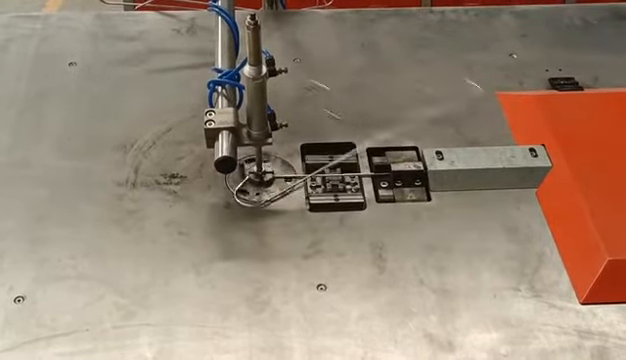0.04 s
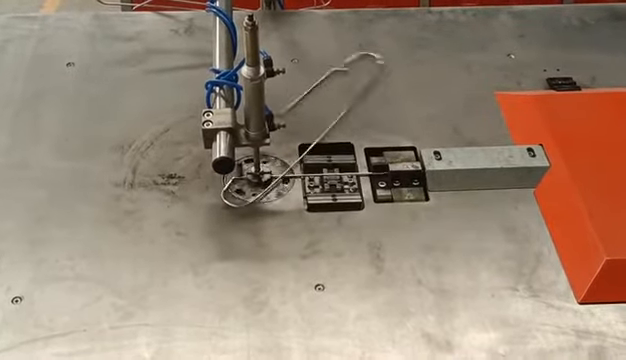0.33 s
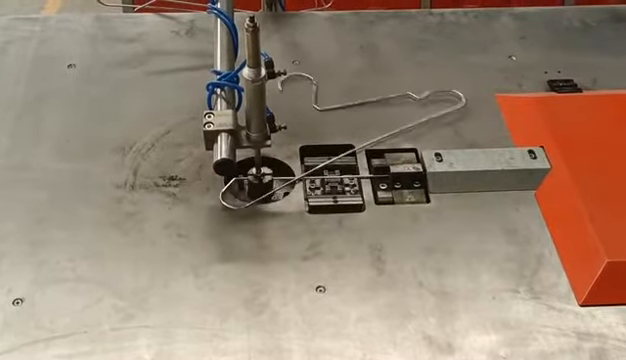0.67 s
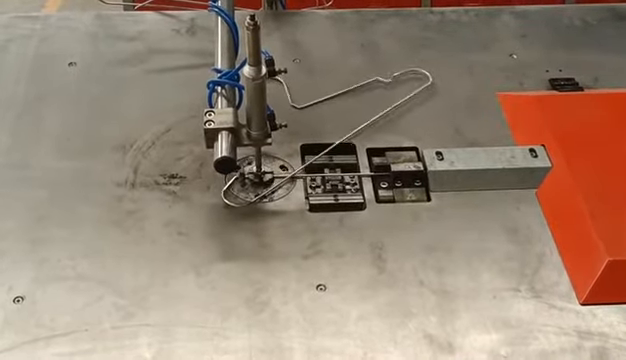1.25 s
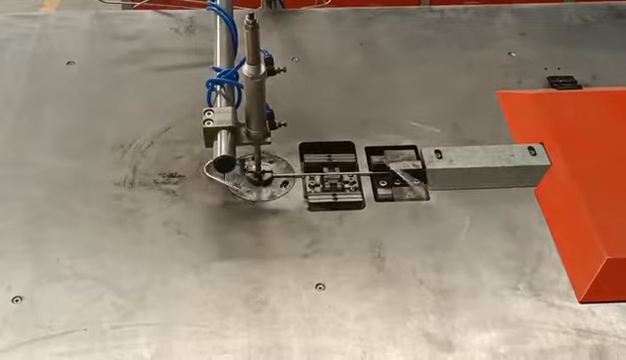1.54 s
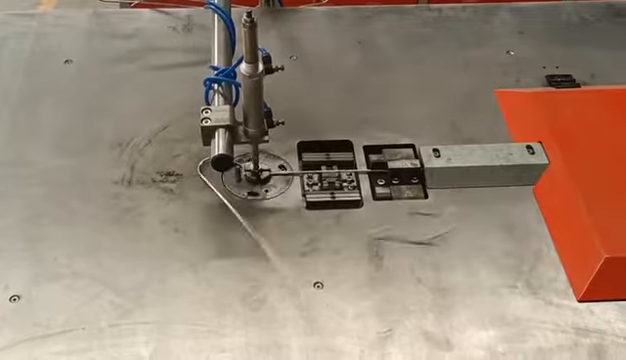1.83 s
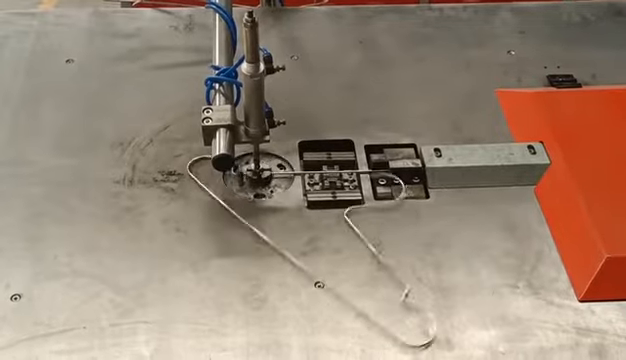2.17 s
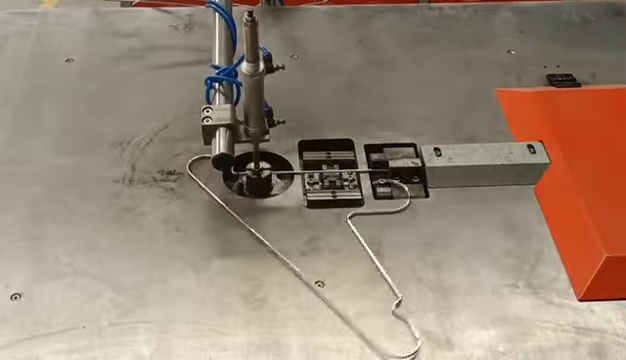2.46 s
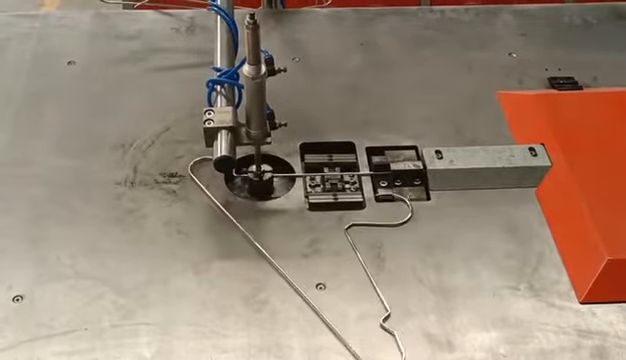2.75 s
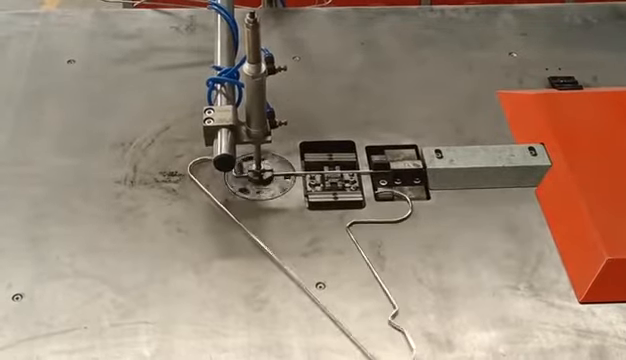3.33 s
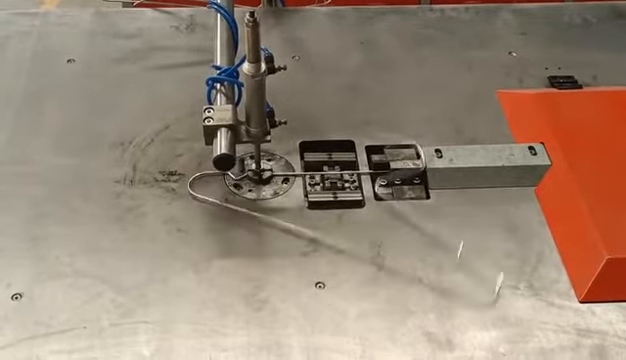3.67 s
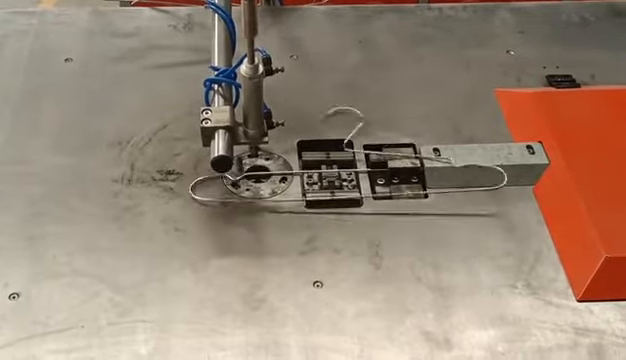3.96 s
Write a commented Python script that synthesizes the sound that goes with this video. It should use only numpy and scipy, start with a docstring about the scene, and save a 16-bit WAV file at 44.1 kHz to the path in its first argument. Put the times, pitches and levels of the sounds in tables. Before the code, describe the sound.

A wire bending machine rumbles and whirs over steady noise in a reverberant workshop. Two light wire slaps on a steel table open, and the head clunks at 0.25 and 0.9 seconds, a thin servo whine between moves. From 1.3 seconds the wire slaps and chatters, with more clunks at 2 and 2.8. From 3.2 come dull jolts and more slaps, then the wire skids and rings until 4 seconds.

```python
"""A wire bending machine works in a reverberant workshop, its drives rumbling over the steady hall noise.
It opens with two light slaps of the long steel wire on the sheet-steel table. The bending head clunks as
it shifts at 0.25 and 0.9 s, and a servo whines between the moves. From 1.3 s the wire slaps and chatters,
and the head clunks again at 2 and 2.8 s. From 3.2 s the frame jolts under a last flurry of slaps,
then the wire skids over the table, ringing freely."""
import sys
import numpy as np
from scipy import signal
from scipy.fft import rfft, irfft, next_fast_len
from scipy.io import wavfile
from scipy.ndimage import uniform_filter1d, map_coordinates

SR = 44100
rng = np.random.default_rng(int(sys.argv[2]) if len(sys.argv) > 2 else 0)


def materialize(psi):
    """Save the field psi as 16-bit PCM at rate SR to the path in sys.argv[1].

    A 1-D psi becomes a single channel; in a 2-D psi each row is a channel.
    """
    bounded = np.clip(np.atleast_2d(psi).T, -1, 1)
    quanta = np.round(bounded * 32767).astype(np.int16)
    wavfile.write(sys.argv[1], SR, quanta)


N = 176400

# Stereo image, tight lows and wide highs: f/Hz, left-right correlation
STEREO_IMAGE = [(30, .9), (100, .975), (300, .97), (520, .92), (650, .45), (820, .2), (1150, .45),
                (1800, 0), (2500, .2), (4000, .06), (6000, .03), (7500, .15)]
# Reverb decay: f/Hz, t60/s
REVERB_DECAY = [(100, 0.44), (1000, 0.72), (4000, 0.84), (8000, 0.31)]
# Tone of the hall, the drives and the gears: f/Hz, level/dB
HALL_EQ = [(25, -19), (60, -15.5), (125, 10.5), (190, -1.5), (265, 10), (400, -3.5), (800, -4), (1500, -10),
           (2300, -4), (3200, -1), (4100, -17), (5000, -18), (7500, -46.5)]
RUMBLE_EQ = [(25, -34.5), (45, -27), (75, -23.5), (115, -2), (170, -1), (250, -1), (330, 0.5), (430, -1.5),
             (600, -7), (900, -11), (2000, -36)]
WHIRR_EQ = [(200, -13), (600, -8), (900, -3), (1300, -0.5), (1850, -0.5), (2400, 1.5), (3400, -3),
            (4100, -1.5), (4700, -7.5), (7500, -14.5)]
# Cabinet panels droning with the drives: f/Hz, level/dB relative to the rumble
PANEL_MODES = [(62, -21), (93, -13), (127, -13.5), (240, -13), (410, -14)]
# Fader rides for drive rumble, gear whirr, high hiss and servo whine: t/s, level/dB
RUMBLE_FADER = [(0, -36), (.14, -45), (.2, -33), (.48, -35), (.6, -31.5), (.73, -34), (.86, -31.5),
                (1.25, -32), (1.52, -37), (1.7, -31), (1.92, -35.5), (2.02, -32), (2.2, -36), (2.36, -45),
                (2.56, -50), (2.66, -35), (2.95, -31), (3.05, -33.5), (3.27, -28), (3.44, -33),
                (3.65, -29.5), (4, -33.5)]
WHIRR_FADER = [(0, -29), (.12, -33), (.2, -28.5), (.48, -32.5), (.6, -27), (.72, -30.5), (.82, -27.5),
               (1.25, -31.5), (1.9, -31), (2.2, -32.5), (2.35, -37.5), (2.6, -37.5), (2.75, -36),
               (2.92, -31), (3.1, -31.5), (3.3, -30), (3.65, -29), (4, -42.5)]
HISS_FADER = [(0, -32), (.22, -36.5), (.48, -40.5), (.58, -35), (.73, -42.5), (.79, -36), (1.15, -57),
              (1.6, -34.5), (2.25, -34), (2.4, -56), (2.62, -55.5), (2.65, -38), (2.75, -48.5),
              (3.1, -45.5), (3.25, -30), (4, -31.5)]
WHINE_FADER = [(0, -44), (.2, -50), (.37, -45), (.45, -37.5), (.53, -48), (.6, -33.5), (.66, -48),
               (.72, -40), (.78, -46), (1.09, -43), (1.13, -37), (1.22, -33.5), (1.285, -36), (1.31, -50),
               (2.32, -51), (2.37, -42), (2.42, -49), (2.5, -39), (2.55, -49), (2.6, -44), (3.09, -42),
               (3.12, -32.5), (3.17, -29.5), (3.195, -32), (3.215, -43), (3.32, -38), (3.4, -48), (4, -43)]
# Head and feed drive jolting the frame: t/s, level/dB, f/Hz
JOLT_CUES = [(0.925, -21.5, 286.5), (2.811, -23.5, 622), (3.226, -24, 178.6), (3.5, -25.5, 90),
             (3.587, -19, 253), (3.622, -23.5, 241), (3.686, -29.5, 279.7)]
# Knocks and pings of the tooling: t/s, level/dB, f/Hz, t60/s
KNOCK_CUES = [(0.2522, -4, 1264, .009), (0.257, -22, 4150, .1), (2.0465, -14, 1264, .009),
              (2.7855, -15, 5980, .035), (3.412, -20, 6700, .02)]
# Head clunks: t/s, thud/dB, clank/dB, clash/dB, thud and boom delay/s, metal attack/s, boom/dB
CLUNK_CUES = [(0.25, -22, -20.5, -26, .002, 0.0046, -50), (0.91, -21, -20, -11.5, 0.0093, 0.017, -26.5),
              (0.957, -33.5, -31, -28, .004, .008, -35.5), (2.04, -19.5, -18, -23.5, 0.0034, 0.0027, -52),
              (2.786, -20.5, -20.5, -13.5, 0.02, 0.0046, -30)]
# The four layers of a clunk, dark to bright: f/Hz, level/dB
BOOM_EQ = [(25, -35), (40, -21), (60, 2.5), (76, -8.5), (93, 3), (110, 2.5), (140, -23), (400, -44.5)]
THUD_EQ = [(25, -26.5), (60, -47), (95, -1.5), (150, -0.5), (230, -6), (380, -4), (600, -8), (1000, -15.5),
           (2500, -40.5)]
CLANK_EQ = [(300, -22.5), (700, -3.5), (1200, 3), (1900, 0), (2600, 7.5), (3400, -1.5), (4100, 7),
            (4800, -11.5), (8000, -25.5)]
CLASH_EQ = [(1500, -26.5), (2900, 3), (4000, -8), (5000, 3), (6200, 7.5), (7300, 13), (8000, -19.5)]
# Body and sheen of the steel table: f/Hz, level/dB
TABLE_BODY_EQ = [(200, -32.5), (450, -2.5), (850, -10.5), (1250, -2), (1900, -3.5), (2500, 1), (3000, 4.5),
                 (3450, 0.5), (3950, 6.5), (4800, 0.5), (5600, -28.5), (7000, -26)]
TABLE_TREBLE_EQ = [(3500, -39), (5000, 8), (5600, 9.5), (6100, 12), (6900, 15), (7450, 13), (8200, -29.5)]
# Ringing modes of the wire: f/Hz, relative level/dB
WIRE_MODES = [(2186, -7), (2460, 0), (2507, 5.5), (2724, -4), (3004, -3), (3180, -7), (3811, -5),
              (3951, -3), (4240, -5), (4305, -3), (5020, -3), (5776, 0), (5990, 2), (6105, 0), (6412, -2),
              (6535, 0), (6805, -1), (6928, 3), (7189, 2), (7386, 2)]
# The wire slapping and skidding on the table: t/s, level/dB, chatter length/s, treble lift/dB, attack/s
SLAP_CUES = [(0.001, -26.5, 0.01, -5.5, 0.0026), (0.178, -27, 0.027, -5, 0.0072),
             (1.3, -21.5, .024, -0.5, 0.0015), (1.359, -21.5, .012, -2, 0.0035),
             (1.44, -20, 0.009, 0.5, 0.0014), (1.524, -19.5, 0.016, 1, 0.012),
             (1.641, -16.5, 0.008, 0, 0.004), (1.672, -16.5, 0.0088, -3, 0.0013),
             (1.73, -22.5, 0.018, -4.5, 0.0097), (1.762, -18.5, 0.0059, 2.5, 0.0029),
             (1.874, -16, 0.0088, -4, .002), (1.893, -23, .012, 0, .004), (1.987, -20, 0.022, -0.5, 0.021),
             (2.074, -31, 0.033, 9, 0.005), (2.127, -26, 0.0094, -0.5, 0.0041),
             (2.175, -30, 0.023, -4.5, 0.0049), (2.216, -31, 0.015, -13, 0.0039),
             (2.269, -31.5, 0.02, -1, 0.0034), (3.202, -21, 0.019, -2, 0.011),
             (3.264, -23.5, 0.018, 4, 0.0057), (3.275, -17.5, 0.023, -4, 0.0042),
             (3.344, -20.5, 0.018, -1, 0.017), (3.358, -22, 0.006, -2, 0.004),
             (3.402, -25, 0.004, -1, .002), (3.443, -27.5, 0.014, 4.5, 0.0065),
             (3.521, -20.5, 0.016, -1, 0.0042)]
SKID_CUES = [(3.565, -21.5, 0.04, -1, 0.015), (3.611, -22.5, 0.018, 4.5, 0.004),
             (3.651, -17, 0.013, 0.5, 0.0051), (3.72, -22, 0.022, 4, 0.0022),
             (3.759, -22.5, 0.015, 0, .006), (3.803, -26.5, 0.021, -3, 0.008),
             (3.88, -18.5, 0.024, 4.5, 0.0078), (3.911, -20, 0.015, -3.5, 0.006),
             (3.938, -25, 0.011, 1.5, .004)]


def amp(db):
    """Decibels to gain."""
    return 10 ** (np.asarray(db) / 20)


def unit(x):
    """Scale to rms 1."""
    return x / np.sqrt(np.mean(x ** 2) + 1e-20)


def along(points, hz):
    """Read a curve of (f/Hz, value) points on a log frequency axis."""
    freqs, values = np.transpose(points)
    return np.interp(np.log(hz + 1), np.log(freqs + 1), values)


def fader(rows):
    """Gain per sample from (t/s, level/dB) rows."""
    return amp(np.interp(np.arange(N) / SR, *np.transpose(rows)))


def wobble(rate):
    """A smooth random modulator with `rate` knots a second."""
    return map_coordinates(rng.standard_normal(int(N * rate / SR) + 4), [np.arange(N) * rate / SR])


def burst(start, attack, hold, t60):
    """Hit envelope, in seconds: a linear attack, and an exponential release from start + hold."""
    envelope, first = np.zeros(N), max(int(start * SR), 0)
    t = np.arange(first, min(N, first + int((hold + 1.2 * t60) * SR))) / SR - start
    envelope[first:first + len(t)] = np.clip(t / attack, 0, 1) * amp(-60 * np.maximum(t - hold, 0) / t60)
    return envelope


def coloured(pair, eq):
    """EQ two unrelated signals and mix them as mid and side into stereo of rms 1."""
    hz = np.fft.rfftfreq(N, 1 / SR)
    width = np.arccos(np.clip(along(STEREO_IMAGE, hz), -1, 1)) / 2
    mid, side = irfft(rfft(pair) * amp(along(eq, hz)) * [np.cos(width), np.sin(width)], N)
    return unit(np.array([mid + side, mid - side]))


def noise(eq):
    """Smooth stereo noise through an EQ curve."""
    return coloured(rng.standard_normal((2, N)), eq)


def steel_wash(depth_db=7.5):
    """The steel's dense resonances come and go as the contact point moves."""
    spectra = signal.stft(rng.standard_normal((2, N)), nperseg=1024)[2]
    shared = rng.standard_normal(spectra.shape[1:])
    patches = shared + 0.52 * rng.standard_normal(spectra.shape)
    patches = uniform_filter1d(patches, size=3, axis=1)  # smear in frequency
    patches = uniform_filter1d(patches, size=4, axis=2)  # smear in time
    emphasis = amp(depth_db * np.minimum(unit(patches), 1.4))
    return signal.istft(spectra * emphasis, nperseg=1024)[1][:, :N]


def chatter(eq, contacts_per_s=1200, direct_share=0.15):
    """Tiny metal contacts, blended with the resonant wash they leave in the steel."""
    sizes = np.exp(0.18 * rng.standard_normal(N))
    touching = rng.random(N) < contacts_per_s / SR
    contacts = unit(sizes * touching * rng.standard_normal((2, N)))
    return coloured(np.sqrt(direct_share) * contacts + np.sqrt(1 - direct_share) * unit(steel_wash()), eq)


def hall_tone(level_db=-40):
    """The steady noise bed of the hall."""
    return amp(level_db) * noise(HALL_EQ)


def hall_reverb(sound):
    """The hall's diffuse tail, lingering longest in the upper mids."""
    hz, t, spectra = signal.stft(rng.standard_normal((2, SR)), SR, nperseg=256)
    decay = amp(-60 * t / along(REVERB_DECAY, hz)[:, None])
    tail = signal.istft(spectra * decay, SR, nperseg=256)[1]
    return signal.fftconvolve(sound, tail / np.linalg.norm(tail[0]), axes=1)[:, :N]


def panels(width_hz=14):
    """Cabinet panels, shaken at random, drone in narrow bands."""
    t = np.arange(N) / SR
    drone = 0
    for hz, db in PANEL_MODES:
        shake = wobble(width_hz) + 1j * wobble(width_hz)
        drone += amp(db) * unit(np.real(shake * np.exp(2j * np.pi * hz * t)))
    return drone


def drives():
    """Rumble, gear whirr and a high hiss swell and sink with the moves."""
    rumble = fader(RUMBLE_FADER) * amp(1.2 * wobble(23.93)) * (noise(RUMBLE_EQ) + panels())
    whirr = fader(WHIRR_FADER) * amp(0.27 * wobble(24.44)) * chatter(WHIRR_EQ)
    hiss = fader(HISS_FADER) * amp(0.62 * wobble(21)) * chatter(TABLE_TREBLE_EQ)
    return rumble + whirr + hiss


def servo(pitch_hz=2266, wander_hz=4, flutter_db=2.2):
    """A slightly unsteady whine that flutters differently left and right."""
    phase = 2 * np.pi * np.cumsum(pitch_hz + wander_hz * wobble(40)) / SR
    flutter = amp(flutter_db * np.array([wobble(16), wobble(23)]))
    return fader(WHINE_FADER) * flutter * unit(np.sin(phase))


def frame_jolts(jitter_hz=31):
    """The jolted frame gives short booms, roughened by fast pitch jitter."""
    jitter = jitter_hz * wobble(150)
    booms = 0
    for start, db, hz in JOLT_CUES:
        tone = unit(np.sin(2 * np.pi * np.cumsum(hz + jitter) / SR))
        booms += amp(db) * burst(start, attack=0.0059, hold=0.0061, t60=0.17) * tone
    return booms


def tooling_knocks(attack_s=.0014):
    """Each sharp knock picks out one strongly damped mode of the tooling."""
    t = np.arange(N) / SR
    return sum(amp(db) * burst(start, attack_s, 2 * attack_s, t60) * np.sin(2 * np.pi * hz * (t - start))
               for start, db, hz, t60 in KNOCK_CUES)


def bending_head():
    """Each shift thuds in the frame and clanks in the tooling; the heaviest also boom in the cabinet."""
    thud = boom = clank = clash = 0
    for start, thud_db, clank_db, clash_db, delay, attack, boom_db in CLUNK_CUES:
        weight = burst(start + delay, attack=0.0018, hold=0.03, t60=0.37)
        thud += amp(thud_db) * weight
        boom += amp(boom_db) * weight
        clank += amp(clank_db) * burst(start, attack, hold=0.033, t60=0.2)
        clash += amp(clash_db) * burst(start, attack, hold=0.0042, t60=0.2)
    low_end = thud * noise(THUD_EQ) + boom * noise(BOOM_EQ)
    metal = clank * chatter(CLANK_EQ) + clash * chatter(CLASH_EQ)
    return low_end, metal


def wire_ticks(trim_db=-1, soften_above_s=0.0049):
    """The hard first contact of each slap; slower attacks tick less."""
    envelope = 0
    for start, db, _, lift_db, attack in SLAP_CUES:
        gain = amp(db + lift_db + trim_db) * min(1, soften_above_s / attack)
        envelope += gain * burst(start, attack=0.00073, hold=0.00087, t60=0.021)
    return envelope * noise(CLASH_EQ)


def wire_ring(force, start, t60=0.16, scatter_db=3.5, detune=.0015):
    """One touch rings the swinging wire, with its own balance and tuning of the modes."""
    t, first = np.arange(SR // 5) / SR, max(int(start * SR), 0)
    modes = 0
    for hz, db in WIRE_MODES:
        gain = amp(db + rng.normal(0, scatter_db))
        modes += gain * np.sin(2 * np.pi * hz * rng.normal(1, detune) * t)
    modes *= amp(-60 * t / t60)
    push = np.pad(force, (0, SR))[first:first + len(t)] * rng.standard_normal((2, len(t)))
    ring = signal.fftconvolve(push, [modes / np.linalg.norm(modes)], axes=1)
    return np.pad(ring, ((0, 0), (first, N)))[:, :N]


def wire_on_table(cues, t60, ring_db, body_db=-2, treble_db=-1.5):
    """Chattering contacts sound the table top and set the wire ringing."""
    body_power = treble_power = ring = 0
    for start, db, length, lift_db, attack in cues:
        force = amp(db) * burst(start, attack, length, t60)
        body_power += force ** 2
        treble_power += (force * amp(lift_db)) ** 2
        ring += wire_ring(force, start)
    body = amp(body_db) * np.sqrt(body_power) * chatter(TABLE_BODY_EQ)
    treble = amp(treble_db) * np.sqrt(treble_power) * chatter(TABLE_TREBLE_EQ)
    return body + treble + amp(ring_db) * ring


def scene():
    """The mix: only the head's clanks and the wire on the table feed the reverb."""
    thuds, clanks = bending_head()
    ticks = wire_ticks()
    slaps = wire_on_table(SLAP_CUES, t60=0.13, ring_db=-6)
    skids = wire_on_table(SKID_CUES, t60=0.14, ring_db=1.5)
    metal = clanks + ticks + slaps + skids
    reverb = amp(-6.5) * hall_reverb(metal)
    return thuds + metal + reverb + tooling_knocks() + frame_jolts() + servo() + drives() + hall_tone()


def record(dry):
    """Master chain: a soft clip rounds the highest peaks, then a brick-wall low-pass cuts the top."""
    ceiling, cutoff_hz = .85, 7580
    rounded = dry / (1 + (dry / ceiling) ** 6) ** (1 / 6)
    size = next_fast_len(N + SR // 2)
    passband = np.fft.rfftfreq(size, 1 / SR) < cutoff_hz
    return irfft(rfft(rounded, size) * passband, size)[:, :N]


dry = scene()
out = record(dry)
materialize(out)
```